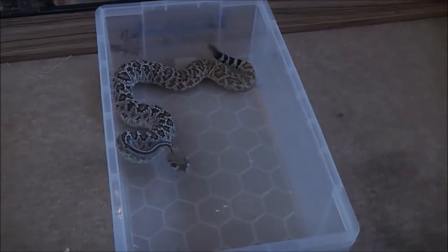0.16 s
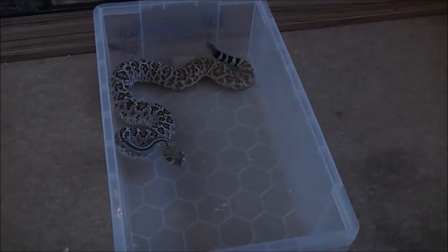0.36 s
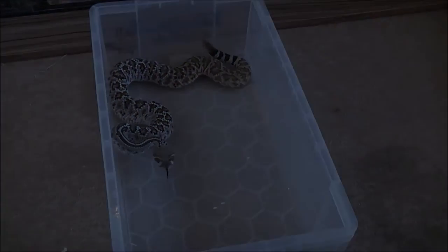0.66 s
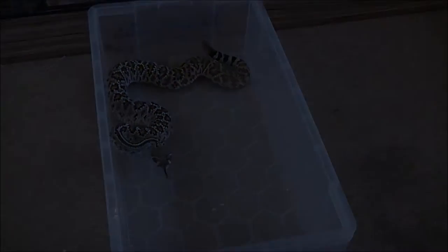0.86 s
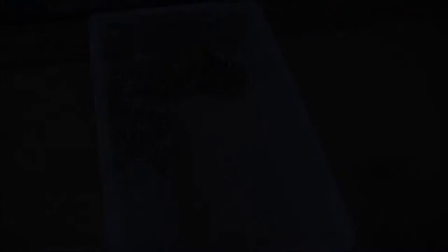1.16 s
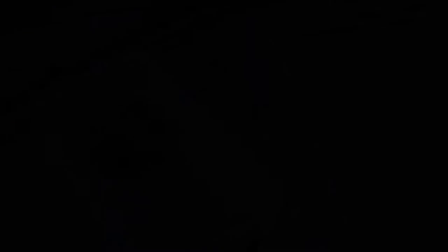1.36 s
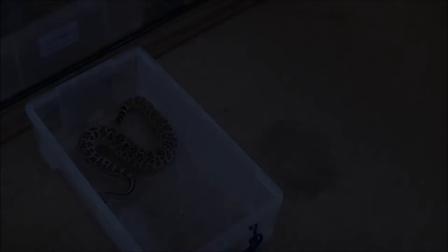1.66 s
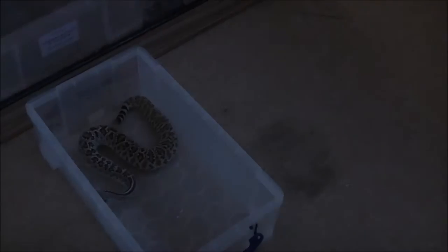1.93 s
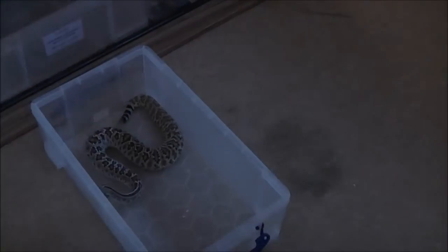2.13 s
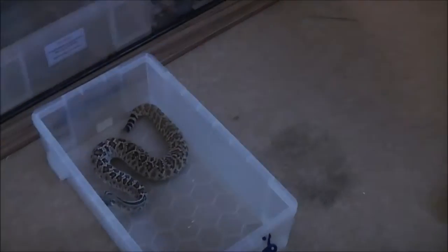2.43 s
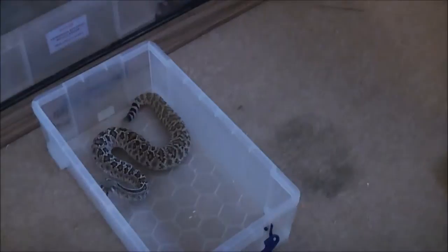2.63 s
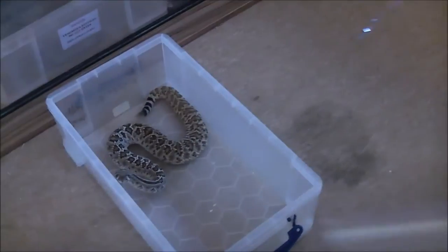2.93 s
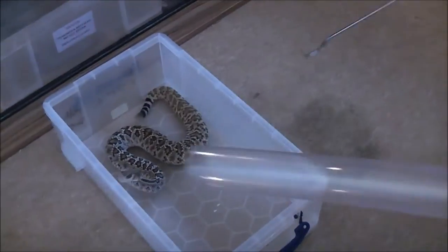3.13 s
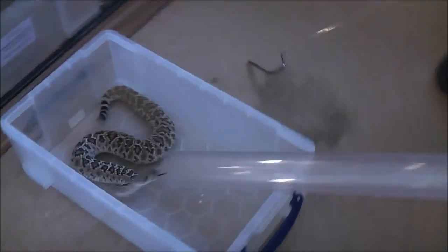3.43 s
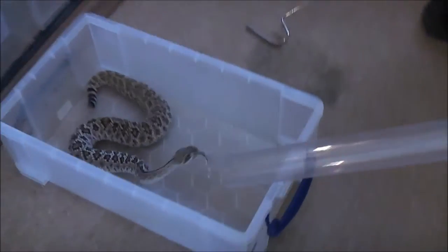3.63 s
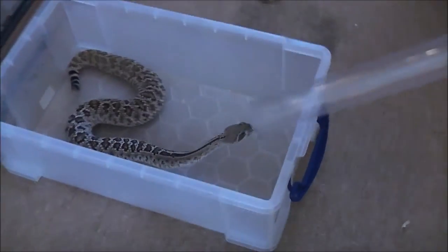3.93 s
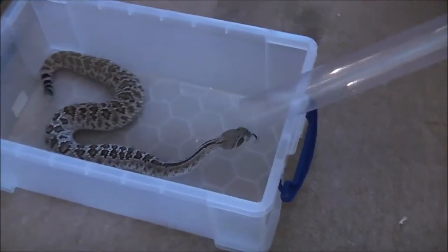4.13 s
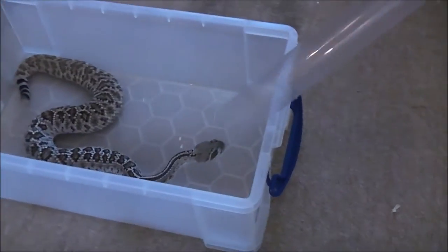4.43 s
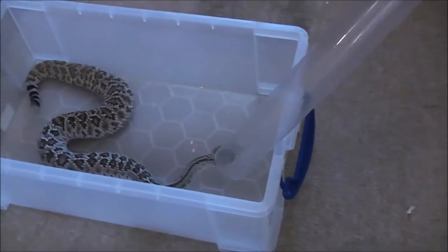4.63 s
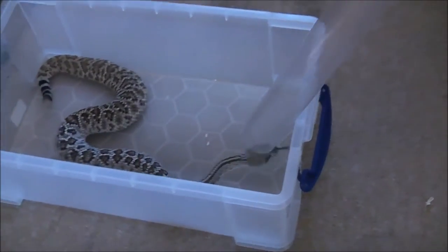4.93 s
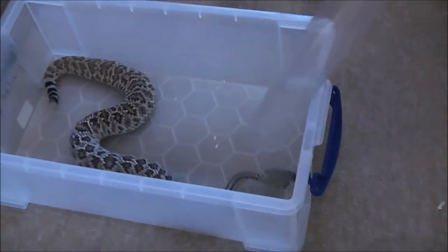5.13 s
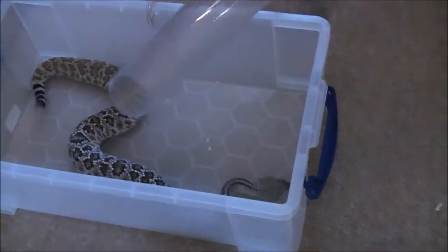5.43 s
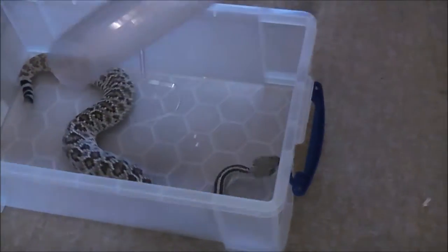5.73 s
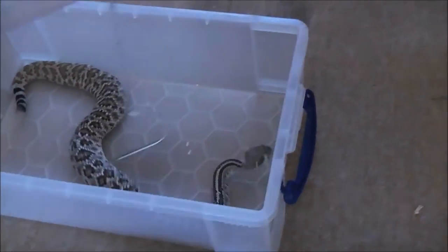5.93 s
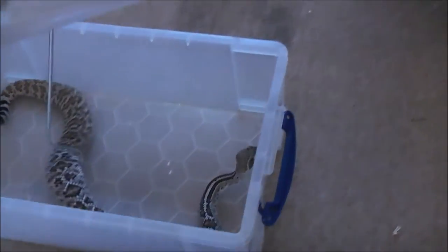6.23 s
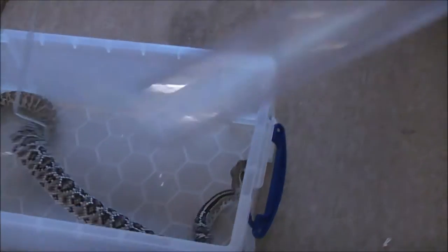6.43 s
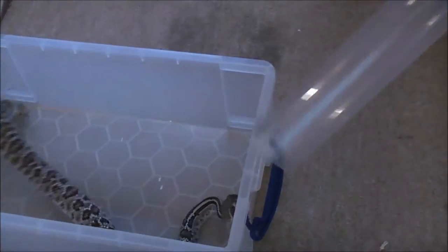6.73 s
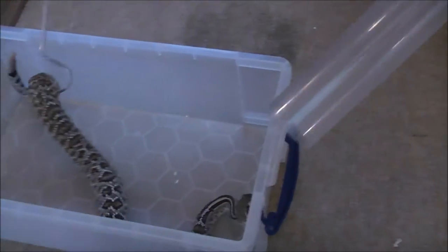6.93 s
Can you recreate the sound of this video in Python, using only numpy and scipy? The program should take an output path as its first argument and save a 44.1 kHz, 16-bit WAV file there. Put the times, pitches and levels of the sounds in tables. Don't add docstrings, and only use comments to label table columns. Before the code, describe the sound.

Dry, hissing rattlesnake rattle close by indoors, cutting out for half a second, then resuming with scattered tube knocks, scrapes and one hard final clack.

```python
import sys
import numpy as np
from scipy import signal
from scipy.fft import rfft, irfft, next_fast_len
from scipy.io import wavfile
from scipy.ndimage import uniform_filter1d, map_coordinates

SR = 44100
rng = np.random.default_rng(int(sys.argv[2]) if len(sys.argv) > 2 else 0)


def store_wav(level_fs):
    pcm = np.round(np.clip(np.atleast_2d(level_fs), -1, 1) * 32767)
    wavfile.write(sys.argv[1], SR, pcm.T.astype(np.int16))


def invert_db(x):
    u = np.asarray(x, float) / 20
    return 10 ** u


N = 312228


def unit(x):
    return x / np.sqrt(np.mean(x ** 2) + 1e-20)


def along(points, hz):
    f, v = np.transpose(points)
    return np.interp(np.log(hz + 1), np.log(f + 1), v)


def curves(rows):
    s, *columns = np.transpose(rows)
    return [np.interp(np.arange(N) / SR, s, column) for column in columns]


def wobble(rate):
    knots = rng.standard_normal(int(N * rate / SR) + 4)
    return map_coordinates(knots, [np.arange(N) * rate / SR])


def filtered(x, response):
    m = next_fast_len(N + SR // 2)
    return irfft(rfft(x, m) * response(np.fft.rfftfreq(m, 1 / SR)), m)[..., :N]


def resonance(f, hz, width_hz):
    return 1j * f * width_hz / (hz * hz - f * f + 1j * f * width_hz)


def clashes(phase, crowding, scatter_db):
    bunching = crowding * np.cos(phase) + .2 * crowding * np.cos(phase / 2)
    rate = 13000 * np.exp(bunching) / np.i0(crowding)
    sign = rng.choice([-1, 1], N)
    return (rng.random(N) < rate / SR) * sign * invert_db(scatter_db * rng.standard_normal(N))


# time in seconds, turns a second.
TAIL_TURNS = [(0, 112), (1.35, 111), (1.9, 116), (2.2, 118), (3.3, 117), (4.15, 114), (4.5, 110),
              (5.05, 111), (5.4, 118), (6, 127), (6.3, 122), (7.08, 123)]
# time in seconds, effort in dB, whip toward the small segments in dB.
SHAKING = [(0, -31.5, -0.5), (.7, -30.5, 0), (1.35, -31.5, -1.5), (1.9, -30, 0), (2.2, -29, 0.5),
           (2.35, -30, -0.5), (2.65, -30, 1), (3.1, -29.5, -1), (3.7, -29.5, 0.5), (4.6, -30.5, 0),
           (5.1, -30.5, 0.5), (5.45, -30.5, 1), (6.05, -29.5, 0), (6.2, -30, -0.5), (6.45, -29.5, 1.5),
           (6.8, -29, 0), (6.92, -26.5, 2), (7.08, -27.5, -0.5)]
# time in seconds, pose (0 near, 1 early, 2 far, 3 lifted).
POSES = [
    (0, 0),
    (1.5, 0),
    (1.7, 1),
    (3.4, 1),
    (3.9, 2),
    (6.36, 2),
    (6.58, 3),
    (7.08, 3),
]
SEGMENT_EDGES_HZ = [3700, 7000, 10500]
SEGMENT_WHIP = (-0.66, -0.6, 0.83, 0.69)
# big, small and tip segments in dB over the middle ones.
SEGMENT_BALANCE = [
    (-8.5, -5, -6),
    (-10, -5, -6.5),
    (-10.5, -4.5, -6.5),
    (-5.5, -9, -7.5),
]
# Hz, width in Hz, then near, early, far and lifted gain in dB.
SHELL_MODES = [(1341, 70, 2.5, 9, 2, -6), (1705, 99, -1, 6, -1.5, 0), (2915, 110, 3.5, 6, 3.5, -0.5),
               (3624, 81, 2.5, 1.5, 2, 1.5), (4580, 430, -0.5, 0.5, 1, -1.5), (5020, 620, 1.5, 0.5, 0.8, 1),
               (5700, 240, 0, 0.5, -2, 0), (6350, 310, 0.4, -0.7, 1.2, -1.5), (8160, 330, 0.2, 2.5, 2.2, 0)]
# Hz, coherence from 0 to 1.
LIKENESS = [(60, 0.91), (110, 0.83), (200, 0.68), (380, 0.81), (700, 0.3), (1290, 0.85), (2380, 0.77),
            (4400, 0.79), (8120, 0.73), (15000, 0.87)]
# Hz, dB per Hz.
NEAR_COLOUR = [(1000, -45), (1700, -23), (2100, -21.5), (2440, -25), (2510, -15.5), (2810, -18),
               (3110, -8.5), (3280, -7), (3570, -3.5), (4140, -1.5), (5620, -7), (6460, -9), (8230, -4),
               (9900, -7.5), (15600, -26)]
EARLY_COLOUR = [(760, -29), (1300, -25), (1850, -19.5), (2080, -15), (2560, -18.5), (2960, -9.5),
                (3210, -7), (3950, -2), (5750, -1.5), (7230, -6.5), (8360, -5.5), (9280, -9.5),
                (10600, -13), (12800, -14.5), (15600, -24)]
FAR_COLOUR = [(760, -38), (1300, -23), (1650, -20), (1810, -24.5), (2140, -15.5), (2690, -19), (2860, -14),
              (3420, -10), (3720, -6), (4670, -4), (5630, -3.5), (6450, -3.5), (9980, -8.5), (13300, -11),
              (15600, -20.5)]
LIFTED_COLOUR = [(760, -50), (1300, -34), (1670, -31.5), (1970, -28.5), (2190, -23.5), (2380, -27.5),
                 (2930, -10.5), (3280, -6.5), (4340, -7), (4720, -3), (7010, -8.5), (8450, -7),
                 (10100, -15.5), (12400, -19), (15600, -29)]


def segment_groups(f, m, whip_db, pose):
    phase = 2 * np.pi * np.cumsum(curves(TAIL_TURNS)[0] * (1 + .03 * wobble(20))) / SR
    edges = [1, *SEGMENT_EDGES_HZ, SR]
    groups = []
    for k, (lag_rad, crowding) in enumerate([(0, .42), (.2, .32), (.5, .36), (.8, .42)]):
        share = 1 / np.sqrt((1 + (edges[k] / (f + 1)) ** 12) * (1 + (f / edges[k + 1]) ** 12))
        contacts = clashes(phase - lag_rad, crowding * (1 + .3 * (pose < .5)), scatter_db=3)
        swing_db = SEGMENT_WHIP[k] * whip_db + 0.404 * wobble(5) + 0.26 * wobble(14)
        groups.append(share * rfft(contacts * invert_db(swing_db), m))
    return groups


def rattle():
    effort_db, whip_db = curves(SHAKING)
    pose = curves(POSES)[0]
    m = next_fast_len(N + SR // 2)
    f, t = np.fft.rfftfreq(m, 1 / SR), np.arange(SR // 4) / SR
    peaks = [np.abs(resonance(f, hz, width)) ** 2 for hz, width, *_ in SHELL_MODES]
    angle = np.arccos(np.clip(along(LIKENESS, f), -1, 1)) / 2
    groups = segment_groups(f, m, whip_db, pose)
    settings = [(NEAR_COLOUR, .95, -6), (EARLY_COLOUR, 1.05, -5),
                (FAR_COLOUR, .95, -5), (LIFTED_COLOUR, 1.05, -5)]
    heard = 0
    for p, (colour, apart, echo_db) in enumerate(settings):
        shells = 1 + sum((invert_db(row[2:][p]) - 1) * peak for row, peak in zip(SHELL_MODES, peaks))
        echoes = rng.standard_normal((2, len(t))) * invert_db(-60 * t / [[.15], [.3]])
        both, differing = rfft(echoes / np.linalg.norm(echoes, axis=1, keepdims=True), m)
        direct = 1 + invert_db(echo_db) * both / np.sqrt(1 + (f / 3500) ** 2)
        ports = np.array([np.cos(apart * angle) * direct, np.sin(apart * angle) * (differing + 0.19)])
        path = shells * (f / (f + 250)) ** 2 * invert_db(along(colour, f)) * ports
        power = (abs(path) ** 2).sum(axis=0)
        big_db, small_db, tip_db = SEGMENT_BALANCE[p]
        mix = 0
        for db, group in zip((big_db, 0, small_db, tip_db), groups):
            mix = mix + invert_db(db) * group / np.sqrt(abs(group) ** 2 @ power)
        presence = np.clip(1 - abs(pose - p), 0, 1) ** 1.07
        heard = heard + presence * irfft(mix * path, m)[:, :N]
    mid, side = np.sqrt(2 * m * N) * heard * invert_db(effort_db + 0.47 * wobble(30) + 0.086 * wobble(20))
    return np.array([mid + side, mid - side])


# start in seconds, end in seconds, first Hz, last Hz, gain in dB.
PASSING_MODES = [(-2.5, .5, 4000, 4100, -1), (-2, 1.4, 4200, 4300, 0.5), (2.7, 3, 7900, 8200, 2),
                 (3, 3.9, 8100, 8700, 2), (5, 3.95, 8800, 8800, 3), (3.7, 4.3, 8050, 7900, 1),
                 (5.2, 6.9, 8600, 8600, 1), (2.9, 2.9, 5900, 5500, 2), (2.5, 3.5, 6200, 5800, 1.5),
                 (1.5, 3.4, 7000, 6700, 2), (4, 4.36, 6800, 6450, 1.5), (4.5, 5.5, 6550, 6300, 3),
                 (8, 5.6, 6450, 6200, 0.7), (5.8, 6.5, 6000, 6400, -1), (2.6, 3.7, 7100, 7200, -1.5),
                 (4.5, 5.5, 7300, 7200, 3), (3.5, 5.1, 4800, 4400, 2.5), (4, 6.3, 4400, 4150, -2),
                 (5, 7.1, 4750, 5200, -0.5), (5.5, 6.95, 4350, 4700, 4.5), (6, 7.7, 5200, 5100, 2.5),
                 (4.5, 5.3, 3900, 4400, 2.2), (7, 11, 3300, 3600, 2), (3, 3.34, 3900, 3400, 3.5),
                 (5.1, 6, 3400, 3300, 4.5), (2.4, 3.35, 13000, 13100, 3.5), (2.5, 3.5, 12200, 11700, 4),
                 (5, 4.4, 16000, 13500, 4), (4, 4.3, 11400, 10700, 1.5), (5, 6, 13000, 13000, 2),
                 (5.5, 6.7, 11200, 11400, 2.5), (2.5, 3.2, 9200, 9200, 0), (3.5, 3.17, 1660, 1700, 7),
                 (4.5, 3.53, 1700, 1700, 5), (4, 4.25, 1720, 1700, 8), (3, 6.55, 1700, 1500, -9),
                 (4, 6.55, 2250, 2170, -13), (1.85, 2.4, 2400, 2500, 5), (3.5, 4.3, 3200, 3160, 4)]


def turning(x):
    hz, t, z = signal.stft(x, SR, nperseg=1024)
    gain_db = np.zeros(z.shape[1:])
    for start, end, from_hz, to_hz, db in PASSING_MODES:
        u = np.clip((t - start) / (end - start), 0, 1)
        centre_hz = from_hz + (to_hz - from_hz) * u
        off = (hz[:, None] / centre_hz - 1) / .03
        gain_db += db * np.sqrt(np.sin(np.pi * u).clip(0)) * np.exp(-off ** 2 / 2)
    return signal.istft(z * invert_db(gain_db), SR, nperseg=1024)[1][:, :N]


# time in seconds, peak in dB.
SINGLE_TAPS = [(0.058, -36), (.201, -40), (.236, -43), (.412, -39), (.485, -38), (.513, -41), (.825, -37),
               (.879, -38), (1.022, -38)]
# time in seconds, first peak in dB.
DOUBLE_TAPS = [(0.128, -41), (0.286, -39), (.341, -39), (.539, -37), (.612, -37.5), (.684, -36),
               (.754, -40.5), (.949, -38.5), (1.094, -41.5), (1.165, -38), (1.221, -40.5), (1.275, -40.5)]
# Hz, width in Hz, level in dB.
WALL_MODES = [(647, 200, 1.5), (950, 250, -1.5), (1247, 260, 1.7), (1750, 320, -0.5), (2140, 320, 1)]


def taps():
    swing_s, again_db = .018, -1
    again = [(s + swing_s, db + again_db) for s, db in DOUBLE_TAPS]
    blows, t = np.zeros(N + SR), np.arange(SR // 100) / SR
    for s, db in [*SINGLE_TAPS, *DOUBLE_TAPS, *again]:
        scuff = rng.standard_normal(len(t)) * invert_db(-60 * t / .011)
        strength = np.linalg.norm(uniform_filter1d(scuff, size=12)) * 3.26
        blows[round(s * SR):][:len(t)] += invert_db(db + 31.5) * scuff / strength

    def wall(f):
        modes = sum((-1) ** k * invert_db(db) * resonance(f, hz, width)
                    for k, (hz, width, db) in enumerate(WALL_MODES))
        return modes * (1j * f / (450 + 1j * f)) ** 2

    return filtered(blows[:N], wall)


# Hz, time to fall 60 dB in seconds.
ROOM_DECAY = [(150, 0.15), (1000, 0.38), (5000, 0.11), (14000, 0.062)]


def room(x, start, apart):
    hz, t, z = signal.stft(rng.standard_normal((2, SR // 2)), SR, nperseg=256)
    decay = invert_db(-60 * t / along(ROOM_DECAY, hz)[:, None])
    widths = np.array([hz ** 0, hz ** 2 / (hz ** 2 + 800 ** 2) + .12])[..., None]
    tail = signal.istft(z * decay * widths, SR, nperseg=256)[1]
    late = np.pad(x, (int(start * SR), 0))[None]
    mid, side = signal.fftconvolve(late, tail / np.linalg.norm(tail[0]), axes=1)[:, :len(x)]
    return np.array([mid + apart * side, mid - apart * side])


# time in seconds, peak in dB, crack in Hz,
# 60 dB decay in seconds, ringing in relative dB.
KNOCK_EVENTS = [(3.333, -32, 273, 0.27, -11), (3.433, -31.5, 860, 0.08, -6), (4.018, -29, 503, 0.41, -9.5),
                (5.627, -19.5, 920, 0.13, 1.5), (5.748, -34, 503, .06, -9),
                (5.873, -20.5, 950, 0.067, -2.5), (6.094, -34, 550, 0.11, -10),
                (6.133, -31.5, 580, .07, -7.5), (6.527, -39, 880, 0.065, -9),
                (6.721, -42.5, 490, 0.052, -10), (6.8463, -8.5, 950, 0.15, -4)]
# Hz, level in dB, 60 dB decay in seconds.
TUBE_MODES = [(209, -8.5, 0.3), (561, 8, 0.15), (946, -4.5, 0.21), (1314, -6, 0.22), (1390, -17, .2),
              (1580, -20, 0.3), (1917, -8, 0.22)]
# Hz, level in dB, 60 dB decay in seconds.
TUB_MODES = [(205, -0.5, 0.4), (385, -12, .5), (430, 0.5, 0.4), (608, -4.5, 0.4), (750, -10, .3),
             (875, -10.5, 0.35), (980, -8, 0.25), (1085, -7.5, .3), (1197, -8.5, 0.4), (1342, -10.5, .2),
             (1576, -13.5, 0.2), (1785, -4, 0.13), (2105, -11.5, 0.2)]


def knocks():
    out, t = np.zeros((2, N + SR)), np.arange(SR // 2) / SR
    dull = signal.butter(2, [300, 1800], "band", fs=SR)
    bright = signal.butter(2, [900, 3000], "band", fs=SR)
    for s, db, crack_hz, t60, ring_db in KNOCK_EVENTS:
        hardest = s > 6.8
        modes, edge_db = (TUB_MODES, -6.5) if hardest else (TUBE_MODES, -8.5)
        tilt = [(200, 3), (390, -3), (crack_hz, 2), (1300, -2), (1800, min(edge_db + 13, 2))]
        ring = 0
        for hz, level, life in modes:
            drift = 2.4 * min(hz / 600, 1) * np.cumsum(rng.standard_normal(len(t))) / np.sqrt(SR / 30)
            fall_db = level + along(tilt, hz) + ring_db - 60 * t / min(0.5 * life, t60)
            ring = ring + invert_db(fall_db) * np.sin(2 * np.pi * hz * t + drift)
        noise = unit(signal.lfilter(*dull, rng.standard_normal(len(t))))
        body = 1.27 * noise * invert_db(-5.0 - 60 * t / (0.69 * t60))
        edge_hz = 2500 if hardest else 2150 if s > 5.8 else 1450
        crack = invert_db(edge_db + 15 - 60 * t / 0.011) * np.sin(2 * np.pi * edge_hz * t)
        crack += invert_db(10.2 - 60 * t / 0.014) * np.sin(2 * np.pi * crack_hz * t)
        click = unit(signal.lfilter(*bright, rng.standard_normal(len(t))))
        crack += invert_db(6 - 60 * t / 0.0065) * click
        hit = (ring + body) * (1 - np.exp(-t / 0.0027)) + crack * (1 - np.exp(-(t / 0.00063) ** 2))
        hit = invert_db(db - 8.0) * hit
        spread = hit - invert_db(db - 7.5) * .65 * ring * (1 - np.exp(-t / .0025))
        ports = hit * invert_db([[-.8], [.8]])
        out[:, round(s * SR):][:, :len(t)] += ports + invert_db(-6.5) * room(spread, start=.008, apart=1.04)
    return out[:, :N]


# start in seconds, length in seconds.
RUB_STROKES = [(.53, .06), (.465, .03), (.59, .05), (1.03, .085), (1.03, .1), (1.9, .4), (2.5, .15),
               (2.7, .3), (3.33, .1), (4.02, .12), (4.02, .1), (4.03, .1), (4.74, .1), (5.29, .05),
               (5.35, .11), (5.355, .075), (5.43, .07), (5.365, .05), (5.4, .05), (5.43, .12), (5.64, .15),
               (5.805, .045), (5.9, .07), (5.985, .04), (6.1, .12), (6.18, .2), (6.39, .1), (6.86, .16)]
# Hz, width in Hz, level in dB.
RUB_MODES = [(337, 50, -46), (350, 60, -52), (350, 60, -58), (350, 180, -50), (210, 34, -54),
             (550, 220, -55.5), (300, 610, -52.5), (353, 340, -59), (254, 69, -47), (310, 280, -44.5),
             (520, 60, -48), (1074, 28, -51), (210, 32, -63), (286, 43, -56), (1126, 78, -51),
             (351, 43, -47), (315, 60, -54), (525, 60, -52), (520, 52, -44), (223, 30, -50.5),
             (230, 71, -57), (980, 90, -52), (795, 400, -47), (950, 250, -49), (211, 51, -52.5),
             (307, 440, -53.5), (199, 260, -53), (432, 43, -45)]


def rubs():
    out, settle = np.zeros(N), SR // 5
    for (s, length), (hz, width_hz, db) in zip(RUB_STROKES, RUB_MODES):
        u = np.linspace(0, 1, round(length * SR))
        mode = signal.iirpeak(hz, hz / width_hz, SR)
        noise = rng.standard_normal(len(u) + settle)
        tone = signal.lfilter(*mode, signal.lfilter(*mode, noise))[settle:]
        out[round(s * SR):][:len(u)] += invert_db(db) * np.sin(np.pi * u ** .6) * unit(tone)
    return out


# time in seconds, peak in dB, pitch in Hz, 60 dB decay in seconds.
FOOTFALLS = [(.416, -28, 150, 0.067), (0.432, -33, 100, 0.13), (.452, -40.5, 150, .1),
             (.468, -30, 85, 0.33), (0.532, -33, 91, 0.16), (2.519, -44, 121, 0.38), (2.599, -54, 70, .2),
             (2.998, -35.5, 85, 0.24), (3.175, -33.5, 400, 0.042), (3.841, -50, 60.5, 0.68),
             (4.023, -36.5, 90, 0.26), (5.63, -35, 90, 0.15), (6.382, -29.5, 180, 0.1),
             (6.396, -31, 200, .08), (6.406, -28, 85, 0.37), (6.438, -39, 95, .2), (6.852, -25, 79, 0.31)]


def thuds():
    out, t = np.zeros(N + SR), np.arange(SR // 2) / SR
    for s, db, hz, t60 in FOOTFALLS:
        band = signal.butter(2, [.7 * hz, 3.5 * hz], "band", fs=SR)
        puff = unit(signal.lfilter(*band, rng.standard_normal(len(t))))
        push = np.sin(2 * np.pi * hz * t) * invert_db(-60 * t / .14)
        onset = 1 - np.exp(-t / .005)
        out[round(s * SR):][:len(t)] += invert_db(db - 60 * t / t60) * (push + 0.28 * puff) * onset
    return out[:N]


# time in seconds, floor rumble in dB.
HANDLER_STIR = [(0, -88.5), (.38, -110), (.5, -62.5), (.85, -75), (1.15, -69), (1.3, -100), (2.0, -82),
                (2.45, -104), (2.6, -68.5), (3.9, -64.5), (4.35, -74.5), (4.7, -97), (5.1, -75), (5.4, -65),
                (5.8, -68), (6.05, -70), (6.5, -63.5), (7.08, -65)]
# Hz, dB per Hz.
MURMUR_SPECTRUM = [(59, -59), (100, -11), (216, -4.5), (709, -4), (973, 0.5), (1060, -9.5), (1370, -9),
                   (1810, -19), (2140, -10), (2700, 1.5), (3510, -38.5), (5940, -120)]
# Hz, dB per Hz.
RUMBLE_SPECTRUM = [(15, -56), (35, -15.5), (55, 1), (85, 5.5), (150, -9.5), (250, -36)]


def air():
    stir_db, t = curves(HANDLER_STIR)[0], np.arange(N) / SR
    swell = sum((t > s) * invert_db(db - 27 - 60 * abs(t - s) / .22) for s, db, *_ in FOOTFALLS)
    murmur = invert_db(-55 + 0.14 * (stir_db + 72.5)) + swell
    layers = [(MURMUR_SPECTRUM, murmur, 1.5, .27), (RUMBLE_SPECTRUM, invert_db(stir_db), 4.5, .33)]
    out = 0
    for spectrum, level, lumpy_db, apart in layers:
        mid, side = filtered(rng.standard_normal((2, N)), lambda f: invert_db(along(spectrum, f)))
        ports = unit(np.array([mid + apart * side, mid - apart * side]))
        out = out + level * invert_db(lumpy_db * wobble(10)) * ports
    return out


def scene():
    tail, small = turning(rattle()), taps() + thuds() + rubs()
    return tail + knocks() + small + invert_db(-10) * room(small, start=.01, apart=.6) + air()


# start in seconds, end in seconds.
WIDE_MOMENTS = [(.08, .18), (.42, .52), (1.13, 1.23), (1.32, 2.02), (2.17, 2.37), (2.68, 3.22),
                (3.32, 3.64)]
# Hz, near share, far share, both from 0 to 1.
WIDTH_KEPT = [(1200, .75, .7), (1400, .03, .5), (2600, .05, .55), (2800, 1, 1), (4500, 1, 1),
              (4700, .03, .08), (8800, .05, .18), (9800, .2, .75), (11200, .15, .75), (11800, .02, .03)]


def narrowed(x):
    mid, side = (x[0] + x[1]) / 2, (x[0] - x[1]) / 2
    hz, t, z = signal.stft(side, SR, nperseg=1024)
    band = np.where(hz < 2800, hz // 170, 9 + hz // 400).astype(int)
    block = np.arange(len(t)) // 4
    luck = rng.random((band.max() + 1, len(t) // 4 + 1))[band][:, block]
    edge_hz, near, far = np.transpose(WIDTH_KEPT)
    near_share = np.interp(hz, edge_hz, near)[:, None]
    far_share = np.interp(hz, edge_hz, far)[:, None]
    change_s = np.where(hz < 2800, 1.6, 2.66)[:, None]
    share = np.where(t < change_s, near_share, far_share)
    wide = sum((t > a) & (t < b) for a, b in WIDE_MOMENTS) * (hz[:, None] > 2800)
    side = signal.istft(z * ((luck < share) | (wide > 0)), SR, nperseg=1024)[1][:N]
    return np.array([mid + side, mid - side])


def cut():
    out_s, in_s, fade_s, remnant_s = 1.3445, 1.887, .011, .035
    t = np.arange(N) / SR
    gone = np.clip((t - out_s) / remnant_s, 0, 3)
    remnant = invert_db(-22 - 12 * gone - 30 * gone ** 4)
    fade_in = np.clip((t - in_s) / fade_s, 0, 1)
    return np.where(t < out_s, 1, np.where(t < in_s, remnant, fade_in))


def band_limit(x):
    return signal.sosfilt(signal.butter(12, 16120, fs=SR, output="sos"), x)


# time in seconds, gain in dB.
GAIN_DUCK = [
    (6.8, -0.5),
    (6.825, -3),
    (6.846, -4.5),
    (6.862, -4),
    (6.92, -2.5),
]


def record(dry):
    heard = narrowed(filtered(dry, lambda f: (f < 15780) * (1j * f / (65 + 1j * f)) ** 2))
    return band_limit(heard * invert_db(curves(GAIN_DUCK)[0]) * cut())


dry = scene()
out = record(dry)
store_wav(out)
```